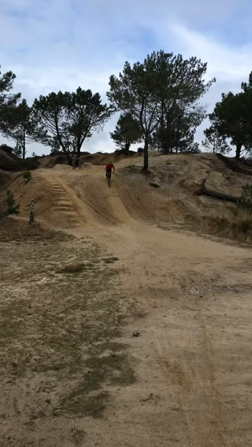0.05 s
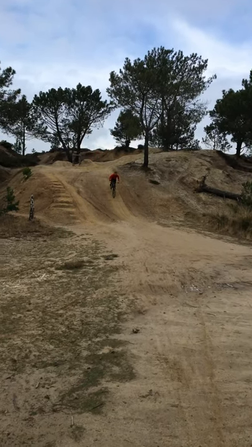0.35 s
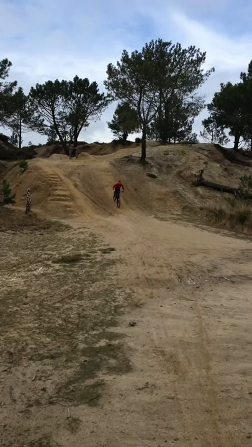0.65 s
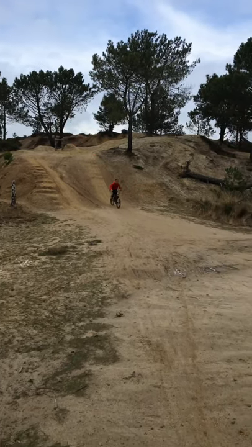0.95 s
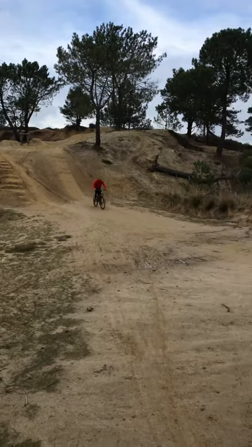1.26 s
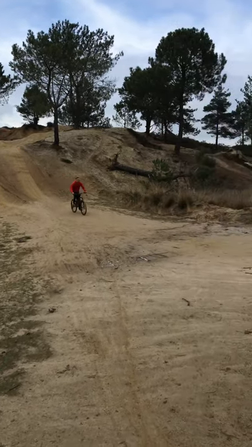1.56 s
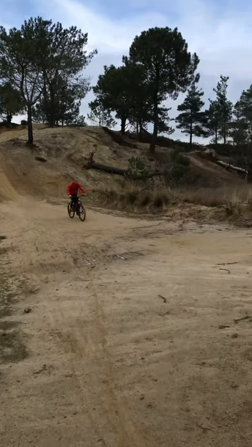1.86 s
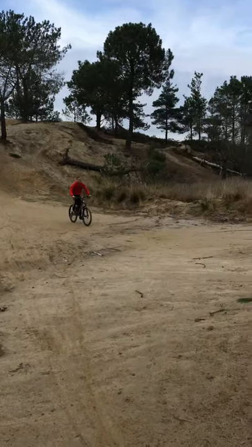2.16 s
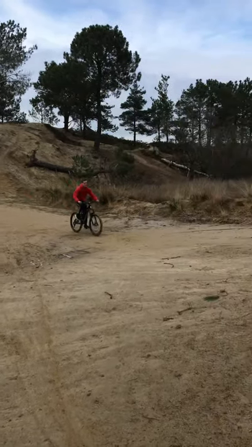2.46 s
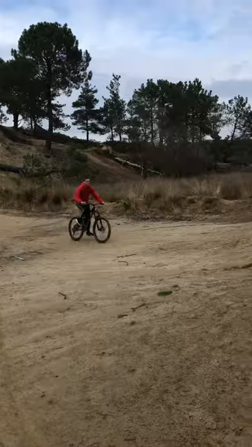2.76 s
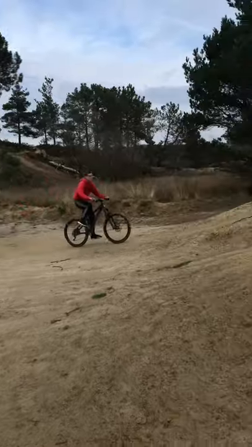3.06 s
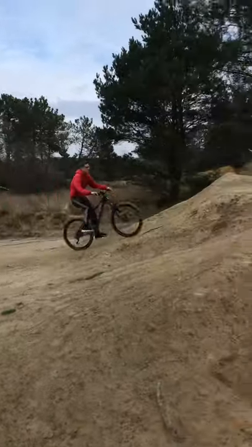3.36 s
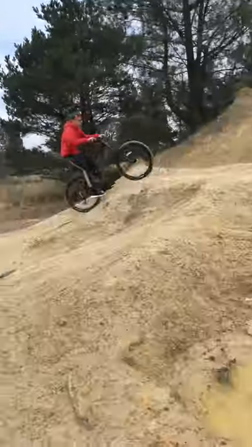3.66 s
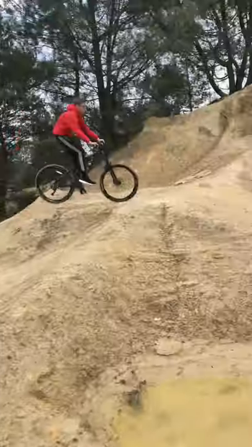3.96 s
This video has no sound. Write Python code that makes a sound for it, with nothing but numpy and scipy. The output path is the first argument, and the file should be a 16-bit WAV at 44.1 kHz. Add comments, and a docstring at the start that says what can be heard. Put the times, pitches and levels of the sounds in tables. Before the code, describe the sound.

A mountain bike coasts over sandy dirt, freewheel ticking and chain rattling.

```python
"""Mountain bike coasting on sand

A bike coasts down a sandy slope, passes close by and rolls up a mound. Its knobbly tyres hum
and crunch grit, the freewheel ticks ever more slowly, and bumps set chain and frame ringing.
Wind buffets the microphone at first; small birds sing far off in the pines."""
import sys
import numpy as np
from scipy import signal
from scipy.fft import rfft, irfft
from scipy.io import wavfile
from scipy.ndimage import uniform_filter1d

SR = 44100
rng = np.random.default_rng(int(sys.argv[2]) if len(sys.argv) > 2 else 0)


def wav_record(signal):
    """Record a signal, one row per channel, as 16-bit PCM in the file named by sys.argv[1]."""
    frames = np.transpose(np.atleast_2d(signal))
    bounded = np.clip(frames, -1, 1)
    # unit amplitude maps onto the largest positive 16-bit level
    quanta = np.round(bounded * 32767).astype(np.int16)
    wavfile.write(sys.argv[1], SR, quanta)


N = 176400
TIME = np.arange(N) / SR


def from_db(db):
    return 10 ** (np.asarray(db) / 20)


def rms_one(x):
    return x / np.sqrt(np.mean(x ** 2) + 1e-20)


def curve(rows):
    """Linear interpolation in time."""
    return np.interp(TIME, *np.transpose(rows))


def colour(x, spectrum):
    """Minimum-phase filtering, normalised so that white noise keeps its power."""
    hz, db = np.transpose(spectrum)
    log_f = np.log(np.fft.rfftfreq(2 * N, 1 / SR) + 1)
    outside = np.maximum(np.log(hz[0]) - log_f, 0) + np.maximum(log_f - np.log(hz[-1]), 0)
    gain = rms_one(from_db(np.interp(log_f, np.log(hz), db) - 20 * outside))
    cepstrum = irfft(np.log(gain))
    cepstrum[1:N] *= 2  # folding the cepstrum makes the filter causal
    cepstrum[N + 1:] = 0
    return irfft(rfft(x, 2 * N) * np.exp(rfft(cepstrum)))[:N]


def noise(spectrum):
    """Filtered Gaussian noise, rms 1."""
    return rms_one(colour(rng.standard_normal(N), spectrum))


def drift(hz):
    """Low-pass random fluctuation, rms 1."""
    lowpass = signal.butter(2, hz, fs=SR, output="sos")
    return rms_one(signal.sosfilt(lowpass, rng.standard_normal(N + SR))[SR:])


def narrow_noise(hz, half_width_hz):
    """Random quadrature modulation broadens a tone into a band, rms 1."""
    phase = 2 * np.pi * np.cumsum(hz * np.ones(N)) / SR
    return rms_one(drift(half_width_hz) * np.cos(phase) + drift(half_width_hz) * np.sin(phase))


def grains(spectrum, per_s, spread_db=8):
    """Shot noise: independent cracks of uneven size, rms 1."""
    sizes = from_db(spread_db * np.minimum(rng.exponential(1, N), 4)) * rng.choice([-1, 1], N)
    return rms_one(colour(sizes * (rng.random(N) < per_s / SR), spectrum))


def bursts(times, db, rise_s, t60, tail_db, tail_t60):
    """Double-slope decay: impacts add in energy, each a crack of noise with a weaker, longer tail."""
    energy = np.zeros(N)
    np.add.at(energy, np.clip((times * SR).astype(int), 0, N - 1), from_db(db) ** 2)
    rise = np.exp(-1 / (rise_s * SR))
    energy = signal.lfilter([1 - rise], [1, -rise], energy + 1e-18)
    poles = [np.exp(-2 * np.log(1000) / (t * SR)) for t in (t60, tail_t60)]
    crack, tail = (signal.lfilter([1], [1, -pole], energy) for pole in poles)
    return np.sqrt(crack + from_db(tail_db) ** 2 * tail) * rng.standard_normal(N)


# Air in the trees: f/Hz, relative spectral density/dB
AIR_SPECTRUM = [(100, -9.5), (300, 2.5), (450, -11), (700, -5.5), (1200, -6), (2300, -29), (3200, -23),
                (6000, -46.5), (15000, -27)]
def air(level_db=-64):
    """Stationary broadband noise: distant air moving in the trees."""
    return from_db(level_db) * noise(AIR_SPECTRUM)


# Short falling chips and longer slurs: onset t/s, relative level/dB
CHIPS = [(.43, -54), (.5, -57), (.58, -56), (.665, -55), (1.45, -55), (1.525, -54), (1.605, -55),
         (1.685, -54), (1.765, -54), (1.99, -56), (3.55, -53), (3.625, -53), (3.725, -52)]
SLURS = [(-.02, -60), (.155, -58), (2.16, -55), (2.36, -55), (2.78, -52.5), (2.98, -57), (3.195, -52.5)]
# Contour of each note: t/s from onset, f/Hz, relative level/dB
CHIP_SHAPE = [(0, 4400, -15), (.008, 4200, 0), (.025, 3500, 0), (.04, 3000, -14)]
SLUR_SHAPE = [(0, 4300, -5.5), (.012, 4300, 4), (0.028, 4830, -4), (.034, 4000, 1.5), (.06, 3300, -1),
              (0.111, 2870, -4), (.15, 2830, -9)]
def birds(gain_db=-5.5, flutter_db=2.5, echo_db=.5, echo_t60=.25):
    """Frequency-modulated glides reverberate by scattering among the trees."""
    song = np.zeros(N)
    warble = 1 + .02 * drift(hz=260)
    for notes, shape in ((CHIPS, CHIP_SHAPE), (SLURS, SLUR_SHAPE)):
        times, hz, db = np.transpose(shape)
        for onset, level_db in notes:
            age = TIME - onset
            pitch = np.interp(age, times, hz) * warble
            envelope = (age > 0) * (age < times[-1]) * from_db(level_db + np.interp(age, times, db))
            song += envelope * np.sin(2 * np.pi * np.cumsum(pitch) / SR)
    song *= from_db(flutter_db * drift(hz=74))
    scatter = rng.standard_normal(SR) * np.exp(-np.log(1000) * TIME[:SR] / echo_t60)
    echo = signal.fftconvolve(song, scatter / np.linalg.norm(scatter))[:N]
    return from_db(gain_db) * (song + from_db(echo_db) * echo)


# Wind rumble: t/s, level/dB
WIND_LEVEL = [(0, -27.5), (.12, -41), (.22, -31), (.4, -33), (.55, -30), (.66, -37), (.85, -35),
              (.95, -30.5), (1.12, -33), (1.28, -48.5), (1.7, -47.5), (2.1, -50.5), (2.8, -48.5),
              (3.1, -47), (3.6, -46.5), (3.82, -50), (4, -41.5)]
# f/Hz, relative spectral density/dB
WIND_SPECTRUM = [(12, -22.5), (24, -7.5), (36, 1.5), (55, -0.5), (80, -10.5), (115, -12.5), (160, -32.5),
                 (185, -40), (225, -30), (290, -45), (600, -74.5)]
# Single eddies: centre t/s, envelope peak level/dB, f/Hz, 1/e half-length/s
EDDIES = [(.316, -15.5, 42, 0.018), (.446, -8, 51.3, 0.014), (.4385, -15.5, 123, 0.0077),
          (0.905, -19.5, 56.16, 0.011), (0.947, -20, 65.6, 0.0064), (1.088, -21, 59.4, 0.014)]
def wind():
    """Turbulent pressure: a low rumble, and eddies that push and then pull on the microphone."""
    eddies = sum(from_db(db) * np.exp(-((TIME - t) / half) ** 2) * np.sin(2 * np.pi * hz * (t - TIME))
                 for t, db, hz, half in EDDIES)
    rumble = noise(WIND_SPECTRUM)
    running_rms = np.sqrt(uniform_filter1d(rumble ** 2, size=6000))
    return from_db(curve(WIND_LEVEL)) * rumble / running_rms + eddies


# Dull puff: f/Hz, relative spectral density/dB
PUFF_SPECTRUM = [(130, -6), (180, -12.5), (225, 1.5), (300, -13.5), (420, -20), (750, -32), (1300, -38)]
def puff(onset_s=.434, level_db=-24.5, t60=.041):
    """The strongest eddy breaks up into exponentially decaying noise."""
    age = np.maximum(TIME - onset_s, 0)
    envelope = (age > 0) * np.exp(-np.log(1000) * age / t60)
    return from_db(level_db) * colour(envelope * rng.standard_normal(N), PUFF_SPECTRUM)


# Brake rub: t/s, level/dB
BRAKE_LEVEL = [(2.87, -83), (2.91, -55.5), (3.2, -57.5), (3.4, -62), (3.55, -72)]
def brake(flicker_db=2):
    """Sliding friction: a light, uneven narrow-band note as the bike nears the mound."""
    envelope = from_db(curve(BRAKE_LEVEL) + flicker_db * drift(hz=36))
    return envelope * narrow_noise(hz=1254, half_width_hz=85)


# Displaced sand: t/s, level/dB
SWOOSH_LEVEL = [(.55, -80), (.68, -52.5), (.85, -52.5), (1.0, -53), (1.3, -92), (2.2, -74), (2.7, -57),
                (3.3, -62), (3.6, -49.5), (3.7, -55), (3.82, -90)]
# f/Hz, relative spectral density/dB
SWOOSH_SPECTRUM = [(120, -15.5), (190, 5.5), (300, -7), (400, 0), (560, -6), (900, -12), (1300, -17.5),
                   (2000, -20)]
def swoosh():
    """Granular flow: the tyres push sand aside where pressed hard, in the dip and up the mound."""
    return from_db(curve(SWOOSH_LEVEL)) * noise(SWOOSH_SPECTRUM)


# Tyre scrape: t/s, level/dB
SCRAPE_LEVEL = [(3.38, -78), (3.39, -54), (3.425, -46.5), (3.46, -50), (3.5, -58), (3.55, -75)]
# f/Hz, relative spectral density/dB
SCRAPE_SPECTRUM = [(800, -12), (1700, 3), (3000, 1.5), (4200, -9), (7000, -22)]
def scrape():
    """Granular friction: dense cracks as a tyre scrapes into the foot of the mound."""
    return from_db(curve(SCRAPE_LEVEL)) * grains(SCRAPE_SPECTRUM, per_s=1300)


# Grit under the tyres: t/s, relative level/dB
GRIT_LEVEL = [(0.0, -61), (0.12, -65.5), (0.22, -63.5), (0.51, -62), (0.67, -61.5), (0.86, -55),
              (1.05, -62.5), (1.32, -63.5), (1.59, -60), (2.27, -57), (2.6, -50), (2.85, -52.5),
              (3.38, -53), (3.53, -49), (4.0, -58.5)]
# f/Hz, relative spectral density/dB
GRIT_SPECTRUM = [(900, -19), (1800, 1), (2500, 1), (3200, 4.5), (4200, 0.5), (5000, -1.5), (5700, -1),
                 (7400, -3.5), (9000, -2.5), (10400, -6.5), (12000, -2), (15500, -6.5)]
def grit(hiss_db=-4, cracks_db=-9.5):
    """Superposed contacts: fine sand merges into a hiss, while single grains crack above it."""
    hiss = from_db(hiss_db) * noise(GRIT_SPECTRUM)
    cracks = from_db(cracks_db) * grains(GRIT_SPECTRUM, per_s=900)
    return from_db(curve(GRIT_LEVEL)) * (hiss + cracks)


# Tyre roar: t/s, relative level/dB
ROAR_LEVEL = [(0, -62.5), (.58, -61.5), (.7, -58), (.84, -53.5), (1.06, -58), (1.5, -56.5), (2.4, -56),
              (2.94, -53.5), (3.35, -52.5), (3.62, -52.5), (3.78, -60.5), (4, -59.5)]
# f/Hz, relative spectral density/dB
ROAR_SPECTRUM = [(90, -8), (170, 7), (280, 4), (400, 4), (480, -2.5), (650, 6.5), (830, -5.5), (1150, -1),
                 (1600, -7), (2500, -9.5), (5000, -48.5)]
def tyre_roar(gain_db=1.5, flicker_db=.6):
    """Rolling contact with the ground radiates dull, slightly flickering noise."""
    return from_db(curve(ROAR_LEVEL) + gain_db + flicker_db * drift(hz=25)) * noise(ROAR_SPECTRUM)


# Tick rate, proportional to rear wheel speed: t/s, f/Hz
TICK_RATE = [(0, 60), (1.3, 62), (2.6, 61.5), (3.0, 59.5), (3.2, 54.5), (3.66, 54), (3.73, 45), (3.77, 31),
             (3.85, 30), (3.92, 23)]
# Pawl impacts: t/s, level/dB
TICK_LEVEL = [(0, -83), (1.1, -64), (1.7, -60), (2.2, -53), (2.6, -47), (3.0, -45), (3.4, -42.5),
              (3.7, -45.5), (3.92, -46), (3.97, -70)]
# Hub resonances: f/Hz, relative gain/dB
HUB_RESPONSE = [(3000, -19.5), (6000, -12), (8000, -5), (9200, 9), (10400, -7), (11300, 3.5), (12800, 12.5),
                (14000, 11), (15000, -0.5), (15900, 8.5)]
def freewheel(one_tick_at_s=3.815, spread_db=1.5):
    """Periodic impact excitation: the pawls drop into tooth after tooth and ring the hub."""
    teeth = np.cumsum(curve(TICK_RATE)) / SR
    teeth -= teeth[int(one_tick_at_s * SR)]
    drops = np.flatnonzero(np.diff(np.floor(teeth)))
    db = curve(TICK_LEVEL)[drops] + spread_db * rng.standard_normal(len(drops))
    ticks = bursts(drops / SR, db, rise_s=.0012, t60=.017, tail_db=-14.5, tail_t60=.08)
    return colour(ticks, HUB_RESPONSE)


# Tread hum: t/s, relative level/dB
HUM_LEVEL = [(0, -73), (1.1, -67.5), (1.4, -59.5), (1.9, -57.5), (2.4, -60.5), (3.3, -61.5), (3.6, -68),
             (3.8, -65)]
# Harmonic number, relative level/dB, half-width/Hz
HUM_PARTIALS = [(1, 0.5, 20.7), (2, -6.5, 36.4), (3, -6.5, 67)]
def tread_hum(knobs_per_tick=5.3):
    """Periodic forcing: tread knobs meet the ground, giving harmonics that follow the wheel speed."""
    knob_hz = knobs_per_tick * curve(TICK_RATE)
    partials = sum(from_db(db) * narrow_noise(k * knob_hz, width) for k, db, width in HUM_PARTIALS)
    return from_db(curve(HUM_LEVEL)) * partials


# Chain slaps and kicked stones: t/s, frame level/dB, link level/dB
KNOCKS = [(.523, -50, -64), (0.565, -43.5, -63), (.689, -42.5, -49), (.736, -47.5, -53), (.785, -45, -59),
          (0.811, -47.5, -55), (0.87, -44.5, -48.5), (.98, -47, -77), (1.901, -61, -53), (1.921, -62, -43),
          (1.986, -56, -46.5), (2.251, -62, -44.5), (2.431, -59, -41.5), (2.458, -50, -36),
          (2.481, -48, -36.5), (2.493, -56, -33), (2.503, -49, -35.5), (2.55, -54, -46), (2.585, -51, -38),
          (2.601, -31, -35.5), (2.622, -50, -33.5), (2.981, -52, -39.5), (3.273, -40.5, -50),
          (3.387, -40, -47), (3.414, -40, -49), (3.422, -41, -47), (3.432, -35.5, -50), (3.45, -37, -39.5),
          (3.476, -26.5, -58), (3.604, -38, -49), (3.873, -35, -45), (3.875, -44.5, -38), (3.911, -39, -49),
          (3.921, -35.5, -40), (3.985, -43.5, -47)]
# Resonances of the frame and of the chain links: f/Hz, relative gain/dB
FRAME_RESPONSE = [(500, 1), (1000, 2.5), (1700, 4), (2300, 3.5), (3050, 8.5), (3900, 6), (5000, 0),
                  (5600, 2.5), (6800, -11.5), (12000, -22)]
LINK_RESPONSE = [(3000, -9.5), (5600, -7.5), (7500, -11), (8500, -5), (9300, -5), (10400, -13), (11800, -8),
                 (12900, -8), (15500, -14)]
def rattles():
    """Impact excitation: each knock rings both frame and links, in its own proportion."""
    times, frame_db, links_db = np.transpose(KNOCKS)
    sound = np.zeros(N)
    for db, response in ((frame_db, FRAME_RESPONSE), (links_db, LINK_RESPONSE)):
        cracks = bursts(times, db, rise_s=.0002, t60=.0046, tail_db=-9.5, tail_t60=.076)
        sound += colour(cracks, response)
    return sound


# Modes of chain and spokes: f/Hz, relative level/dB, T60/s
STEEL_MODES = [(2273, -9.5, 0.061), (2930, -10, 0.1), (3330, -10.5, 0.054), (5530, -3.5, 0.075),
               (5700, -16, 0.095), (6900, -5, 0.053), (8090, 1, 0.025), (8860, -1, 0.039),
               (9220, -2, 0.043), (12140, -12.5, 0.066), (12200, -6, .05)]
# Random light touches: t/s, relative level/dB
JINGLE_LEVEL = [(0, -56), (.8, -47), (1.1, -53), (2, -46), (3, -41), (4, -47)]
def pings(gain_db=-15, spread_db=4, jingles_per_s=9):
    """Damped free vibration: small steel parts ring on after each knock and also jingle at random."""
    times, _, links_db = np.transpose(KNOCKS)
    jingle = from_db(curve(JINGLE_LEVEL))
    sound = np.zeros(N)
    for hz, db, t60 in STEEL_MODES:
        strikes = (rng.random(N) < jingles_per_s / SR) * jingle
        strikes[np.clip((times * SR).astype(int), 0, N - 1)] = from_db(links_db)
        strikes *= from_db(gain_db + db + spread_db * np.clip(rng.standard_normal(N), -2, 1))
        radius = np.exp(-np.log(1000) / (t60 * SR))
        angle = 2 * np.pi * hz / SR
        feedback = [1, -2 * radius * np.cos(angle), radius ** 2]
        sound += signal.lfilter([0, np.sin(angle)], feedback, strikes + 1e-18)
    return sound


def scene():
    """Linear superposition of bike, wind and woods at one microphone."""
    tyres = tyre_roar() + tread_hum() + grit() + scrape() + swoosh()
    bike = tyres + freewheel() + brake() + rattles() + pings()
    return (bike + wind() + puff() + birds() + air())[None]


def record(dry):
    """Band limiting: a steep elliptic low-pass removes the highest treble."""
    cutoff_hz = 15900
    return signal.sosfilt(signal.ellip(16, .1, 80, cutoff_hz, fs=SR, output="sos"), dry)


dry = scene()
out = record(dry)
wav_record(out)
```